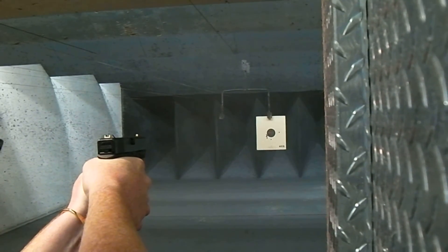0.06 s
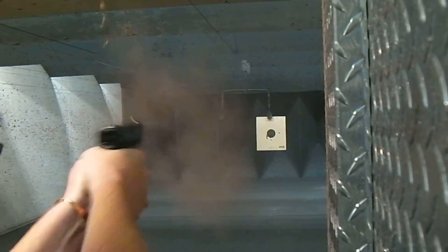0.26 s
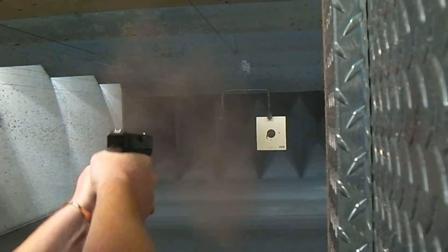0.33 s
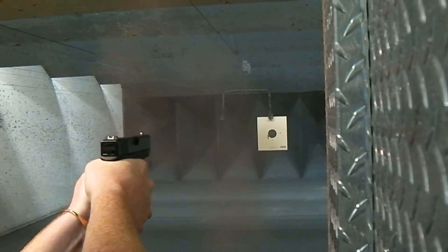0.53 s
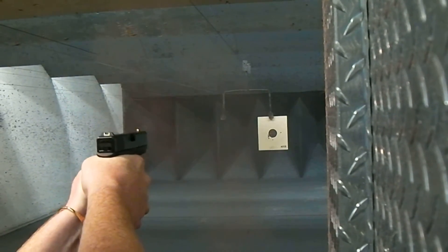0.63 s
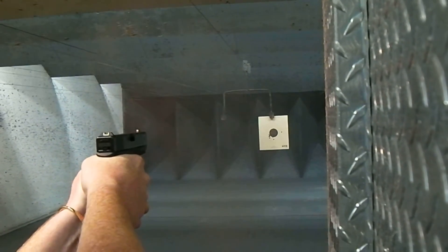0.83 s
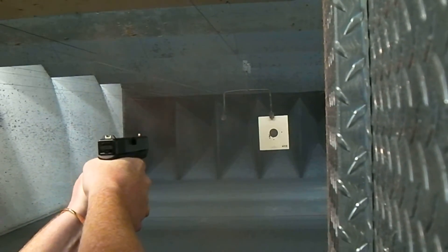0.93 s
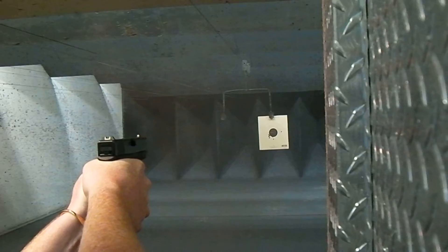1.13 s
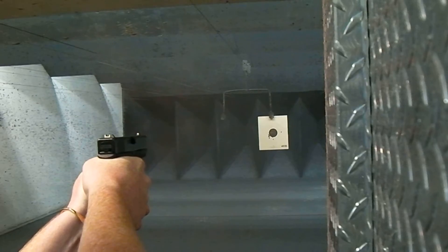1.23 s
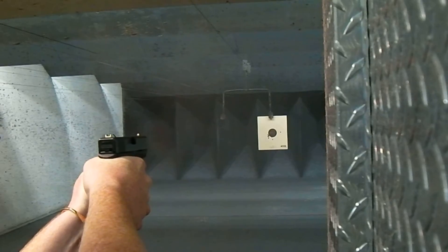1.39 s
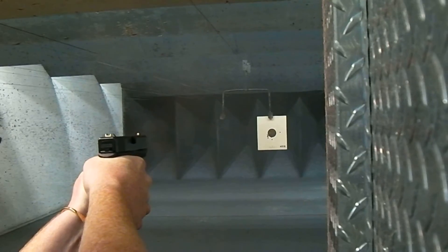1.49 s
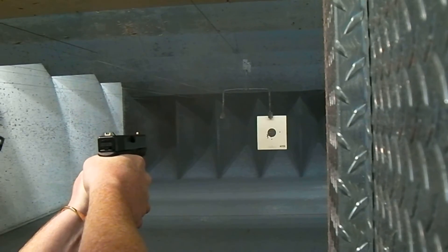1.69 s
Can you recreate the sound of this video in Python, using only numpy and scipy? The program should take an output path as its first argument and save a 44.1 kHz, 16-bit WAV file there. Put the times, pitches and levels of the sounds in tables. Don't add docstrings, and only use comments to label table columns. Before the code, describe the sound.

A handgun fires once in a narrow indoor range after a tiny click; the close microphone overloads, a long steel-and-concrete echo follows, and the ejected casing ticks off the booth, then the floor, over steady ventilation.

```python
import sys
import numpy as np
from scipy import signal
from scipy.fft import rfft, irfft, next_fast_len
from scipy.io import wavfile
from scipy.ndimage import uniform_filter1d, map_coordinates

SR = 44100
rng = np.random.default_rng(int(sys.argv[2]) if len(sys.argv) > 2 else 0)


def master_out(mix):
    frames = np.transpose(np.atleast_2d(mix))
    ceiling = np.clip(frames, -1, 1)
    pcm = np.round(ceiling * 32767).astype(np.int16)
    wavfile.write(sys.argv[1], SR, pcm)


def natural_amplitude(level_db):
    exponent = np.asarray(level_db, float) / 20
    return 10 ** exponent


N = 77175
SHOT_S = 0.1998


def unit(x):
    return x / np.sqrt(np.mean(x ** 2) + 1e-20)


def along(points, hz):
    f, v = np.transpose(points)
    return np.interp(np.log(hz + 1), np.log(f + 1), v)


def filtered(x, response):
    size = next_fast_len(N + 8192)
    return irfft(rfft(x, size) * response(np.fft.rfftfreq(size, 1 / SR)), size)[..., :N]


def since(start_s):
    t = np.arange(N) / SR - start_s
    return np.maximum(t, 0), t >= 0


def stereo_noise(response, near=0):
    # (frequency [Hz], left-right correlation [-1..1])
    likeness = [(60, .9), (130, 1), (290, 0.99), (640, 0.91), (1410, 0.87), (3100, 0.35), (6820, -0.33),
                (11000, -0.55), (15000, -0.19)]

    def mid_side(hz):
        angle = np.arccos(np.clip(along(likeness, hz) + near, -1, 1)) / 2
        return response(hz) * [np.cos(angle), np.sin(angle)]

    mid, side = filtered(rng.standard_normal((2, N)), mid_side)
    return unit(np.array([mid + side, mid - side]))


def coloured(spectrum, near=0):
    return stereo_noise(lambda hz: natural_amplitude(along(spectrum, hz)), near)


def resonances(modes):
    return lambda f: sum(natural_amplitude(db) * 1j * f * w / (c * c - f * f + 1j * f * w) for c, w, db in modes)


def wobble(rate_hz, count):
    knots = rng.standard_normal((count, 120))
    return np.array([map_coordinates(k, [np.arange(N) * rate_hz / SR]) for k in knots])


def ventilation():
    # (frequency [Hz], density [dB per Hz])
    air = [(18, -61.5), (40, -25), (110, 1.5), (280, -13.5), (560, -8), (900, -15.5), (1600, -15),
           (5000, -34.5)]
    # (frequency [Hz], level [dB])
    hum = [(120, -45.5), (550, -51), (594, -52.5), (1540, -61.5)]
    hz, db = np.transpose(hum)[:, :, None]
    tones = natural_amplitude(db) * np.sin(2 * np.pi * hz * np.arange(N) / SR)
    return natural_amplitude(-47) * coloured(air) + tones.sum(axis=0)


def low_thumps():
    # (time [s], level [dB], frequency [Hz])
    thumps = [
        (0.189, -36, 50),
        (0.226, -15, 65),
        (.29, -19.5, 60),
        (0.343, -18.5, 60),
        (0.7938, -18.5, 115),
    ]
    out = np.zeros(N)
    for start_s, db, hz in thumps:
        t, on = since(start_s)
        out += natural_amplitude(db) * np.sin(2 * np.pi * hz * t) * hz * t * np.exp(1 - 2 * hz * t) * 2
    return out


def casing_contacts():
    # (time [s], tick level [dB], scatter level [dB], scatter t60 [s], left over right [dB])
    contacts = [(0.6607, -5.5, -34.5, .03, 7), (.783, -44, -24.5, .06, 0), (0.7867, -18.5, -21, .02, -3.5),
                (.7935, -2, -10, 0.054, -2), (.815, -60.5, -37, .3, 0), (.858, -44.5, -34, .3, -1),
                (1.3103, -44.5, -57.5, .03, 5.5), (1.5003, -17.5, -15, .035, -1.5),
                (1.524, -20.5, -30, .07, -1.5), (1.56, -57, -46.5, .3, -7),
                (1.6081, -36.5, -49.5, .08, 3.5)]
    # (frequency [Hz], density [dB per Hz])
    crack_spectrum = [(1800, -41.5), (3500, -21.5), (6000, -11.5), (8500, -8), (13300, -5), (15800, -12.5)]
    # (frequency [Hz], width [Hz], level [dB])
    clink_modes = [(2630, 220, 1.5), (3780, 370, 0), (5300, 300, -2.5), (6340, 300, 0), (8860, 400, 3),
                   (13200, 500, -1.5)]
    # (frequency [Hz], density [dB per Hz])
    roll_spectrum = [(1500, -39.5), (3000, -7.5), (6000, -6), (9500, -0.5), (12000, -7), (15800, -15)]
    tick_t60_s, floor_from_s = 0.007, 1
    linger_db, linger_t60_s = -27, 0.2

    crack = coloured(crack_spectrum, near=0.26)
    clink = 0.8 * stereo_noise(resonances(clink_modes), near=0.34)
    roll = coloured(roll_spectrum)
    out = np.zeros((2, N))
    for start_s, tick_db, scatter_db, t60_s, pan_db in contacts:
        t, on = since(start_s)
        strike = crack + clink * (start_s > floor_from_s)
        tick = natural_amplitude(tick_db - 60 * t / tick_t60_s) * strike
        early = natural_amplitude(-60 * t / t60_s) * (strike + roll) / 2 ** 0.5
        linger = natural_amplitude(linger_db - 60 * t / linger_t60_s) * roll
        pan = natural_amplitude(np.array([[pan_db / 2], [-pan_db / 2]]))
        out += on * (tick + natural_amplitude(scatter_db) * (early + linger)) * pan
    return out


def casing_rings():
    # (time [s], level [dB], length [s], share of the brass t60 [ratio])
    flights = [
        (.435, -27, 0.027, 0.4),
        (0.659, -32, 0.094, 1.2),
        (1.3104, -48.5, .055, 0.58),
        (1.508, -52, .016, 1),
        (1.5275, -40, 0.038, 6.9),
        (1.567, -57, .017, .5),
    ]
    brass_hz, beat_hz, beat_share = 9885, 43, 0.85
    brass_t60_s, release_s = 0.3, 0.0026
    out = np.zeros(N)
    for start_s, db, length_s, share in flights:
        t, on = since(start_s)
        tone = np.sin(2 * np.pi * brass_hz * t) + beat_share * np.sin(2 * np.pi * (brass_hz - beat_hz) * t)
        release = np.clip((length_s - t) / release_s, 0, 1)
        out += on * natural_amplitude(db - 60 * t / (share * brass_t60_s)) * tone * release
    return out


def hammer():
    # (frequency [Hz], density [dB per Hz])
    scrape = [(600, -29.5), (1900, -4.5), (2600, -20.5), (4000, -5.5), (6200, -1.5), (7400, -12.5),
              (9500, -1.5), (15500, -20.5)]
    click_s, click_db, swell_s = 0.1887, -6.5, 0.0013
    trigger_db, trigger_s, rattle_db = -36, 0.012, -19
    t = np.arange(N) / SR - click_s
    before = np.minimum(t, 0)
    rising = natural_amplitude(click_db) * np.exp(before / swell_s) + natural_amplitude(trigger_db) * np.exp(before / trigger_s)
    rattle = natural_amplitude(rattle_db) * (t < SHOT_S - click_s)
    return np.where(t < 0, rising, rattle) * coloured(scrape, near=0.4)


def range_tail():
    # (frequency [Hz], density [dB per Hz])
    answer = [(40, -33), (250, -12), (400, 1.5), (1300, -3.5), (2200, -9.5), (5000, -9.5), (10000, -10),
              (16000, -6)]
    # (frequency [Hz], build-up time [s])
    build_up = [(100, 0.011), (600, 0.026), (2000, .02), (5000, .005), (12000, 0.00081)]
    # (frequency [Hz], t60 [s])
    decay = [(60, 1.5), (400, 2.15), (1200, 2.515), (3000, 2.043), (6000, 1.1), (8500, 0.78), (11000, 0.58),
             (15000, 0.38)]
    patchy_db = 1.2
    hz, frame_s, z = signal.stft(coloured(answer), SR, nperseg=256, noverlap=192)
    patches = uniform_filter1d(rng.standard_normal(z.shape[1:]), 5, 0)
    patches = unit(uniform_filter1d(patches, 20, 1))
    t = np.maximum(frame_s - SHOT_S, 0)
    rise = 1 - np.exp(-(t / along(build_up, hz)[:, None]) ** 2)
    z = z * rise * natural_amplitude(patchy_db * patches - 60 * t / along(decay, hz)[:, None])
    return natural_amplitude(4) * signal.istft(z, SR, nperseg=256, noverlap=192)[1][:, :N]


def booth_burst(t):
    # (frequency [Hz], density [dB per Hz])
    booth = [(900, -36), (1800, -14), (5000, -9), (11000, 0), (16000, 0)]
    return natural_amplitude(13 - 60 * t / 0.028) * coloured(booth)


def wall_slap():
    # (frequency [Hz], density [dB per Hz])
    slap = [(900, -28), (2000, -6), (3500, -3), (4800, -3), (5600, -29.5)]
    delay_s, level_db, t60_s = 0.0075, 2.5, 0.074
    t, on = since(SHOT_S + delay_s)
    return on * natural_amplitude(level_db - 60 * t / t60_s) * coloured(slap)


def steel_panels(t):
    # (frequency [Hz], level [dB], share of the panel t60 [ratio])
    panels = [(421, 2.5, 0.64), (398.2, -9.5, 1.3), (514, -7.5, 1), (646.3, -2.5, 1.16), (830, -5, 0.55),
              (898, -8, .7), (1015, -1.5, 0.59), (1288, 0.5, .7)]
    level_db, t60_s, waver_db, waver_hz = -19, 3.9, 3.5, 28
    hz, db, share = np.transpose(panels)[:, :, None]
    waver = waver_db * wobble(waver_hz, count=len(hz))
    modes = natural_amplitude(db - 60 * t / (share * t60_s) + waver) * np.sin(2 * np.pi * hz * t)
    return natural_amplitude(level_db) * modes.sum(axis=0)


def tunnel_boom(t):
    # (frequency [Hz], density [dB per Hz])
    boom = [(20, -34.5), (50, -14), (130, 0.5), (220, 0), (330, -36)]
    level_db, hold_s, t60_s = -29.5, 0.52, 0.8
    return natural_amplitude(level_db - 60 * np.maximum(t - hold_s, 0) / t60_s) * coloured(boom)


def shot():
    pulse_s, pulse_db, panel_rise_s = 0.00006, 4, 0.02
    t, on = since(SHOT_S)
    pulse = natural_amplitude(pulse_db) * (1 - t / pulse_s) * np.exp(-t / pulse_s)
    swell = 1 - np.exp(-t / panel_rise_s)
    resonant = swell * (steel_panels(t) + tunnel_boom(t))
    return on * (pulse + booth_burst(t) + wall_slap() + range_tail() + resonant)


def scene():
    return ventilation() + low_thumps() + casing_contacts() + casing_rings() + hammer() + shot()


def roll_off(x):
    return signal.sosfilt(signal.butter(12, 15630, fs=SR, output="sos"), x)


def record(dry):
    # (time [s], gain [dB])
    gain = [(0.327, -1.5), (0.351, -3.5), (.4, -4.5), (.6, -1.5), (.76, -2), (0.899, -3.5), (1.3, -5.5),
            (1.6, -3)]
    # (frequency [Hz], density [dB per Hz])
    hiss_spectrum = [(2000, -20.5), (5000, 3), (16000, -2)]
    top_hz, edge_hz = 15900, 250
    notch_hz, notch_width_hz, notch_depth = 7850, 250, 0.85
    ceiling, hardness = 1.0, 14
    left_db, hiss_db, out_gain = 0.3, -58, 1.14

    def band_limit(f):
        return np.clip((top_hz - f) / edge_hz, 0, 1) ** 2

    def port(f):
        return (1 - notch_depth * np.exp(-((f - notch_hz) / notch_width_hz) ** 2)) * band_limit(f)

    s, db = np.transpose(gain)
    gain_db = np.interp(np.arange(N) / SR, s, db) + np.array([[left_db], [-left_db]])
    x = filtered(dry, port) * natural_amplitude(gain_db)
    x = x / (1 + np.abs(x / ceiling) ** hardness) ** (1 / hardness)
    x = filtered(x + natural_amplitude(hiss_db) * coloured(hiss_spectrum), band_limit)
    mix = np.clip(out_gain * x, -1, 1)
    return roll_off(mix)


dry = scene()
out = record(dry)
master_out(out)
```